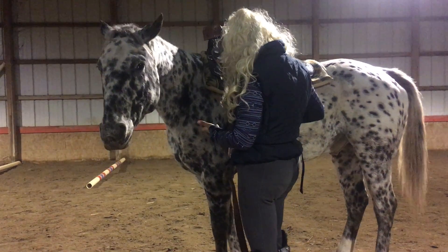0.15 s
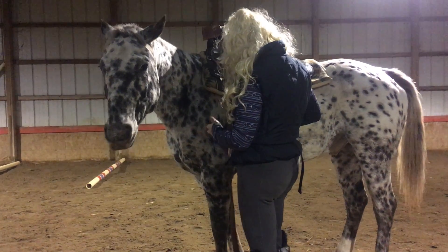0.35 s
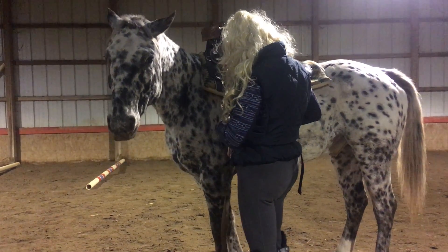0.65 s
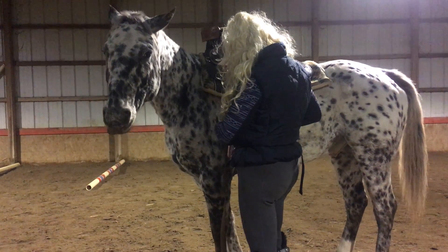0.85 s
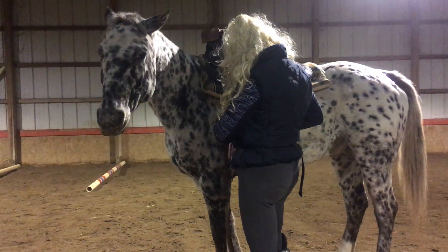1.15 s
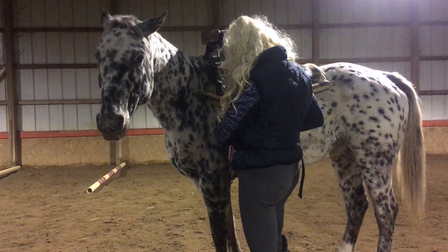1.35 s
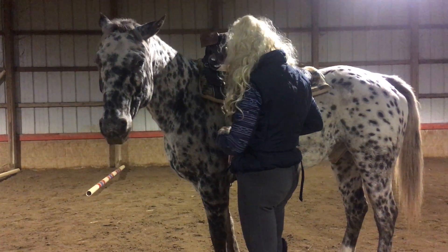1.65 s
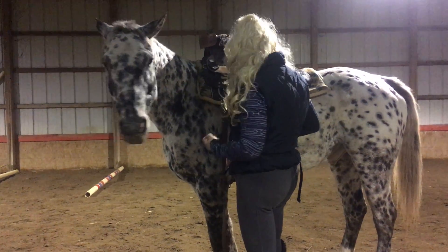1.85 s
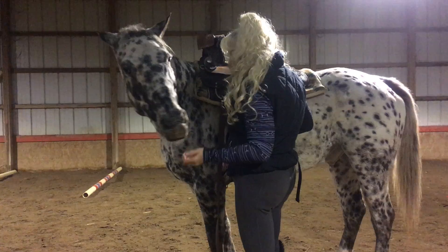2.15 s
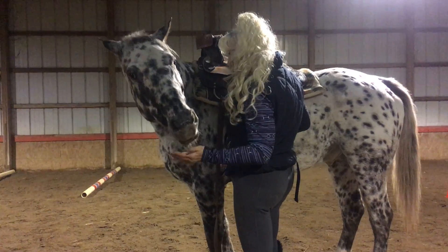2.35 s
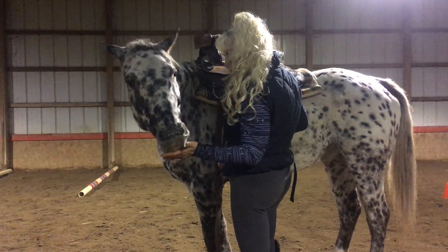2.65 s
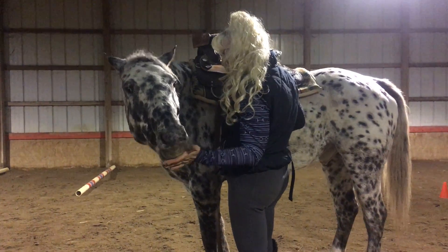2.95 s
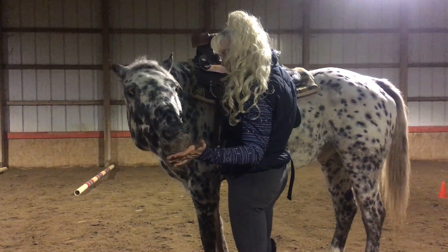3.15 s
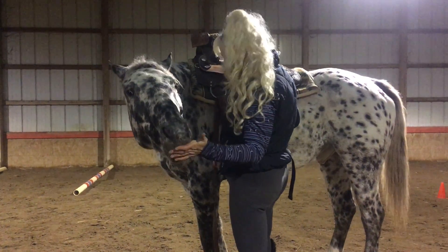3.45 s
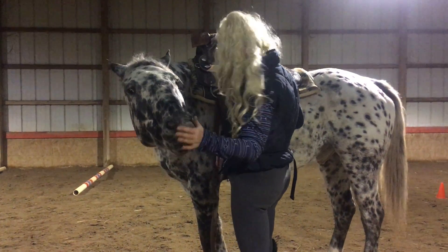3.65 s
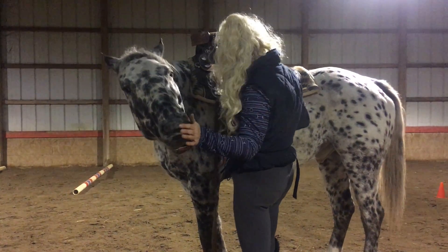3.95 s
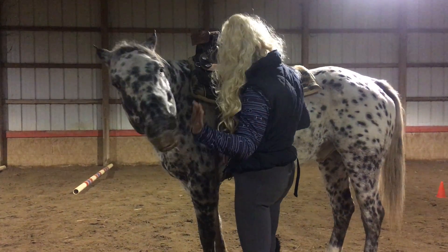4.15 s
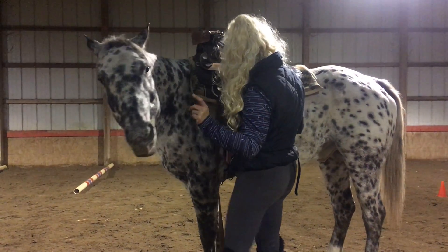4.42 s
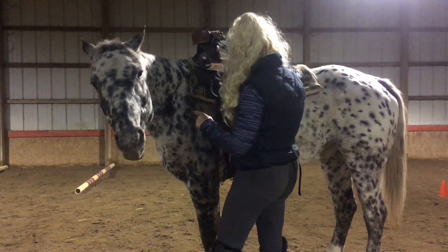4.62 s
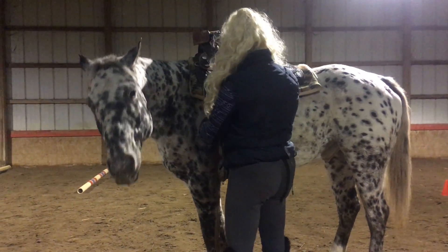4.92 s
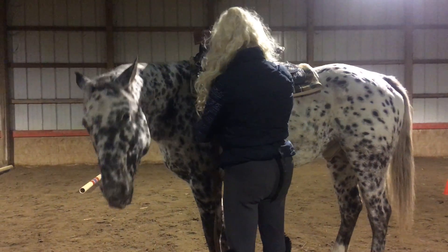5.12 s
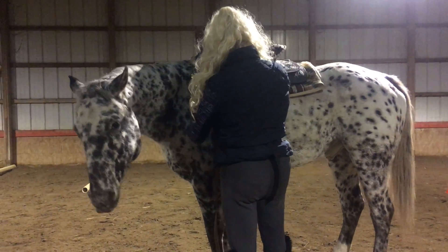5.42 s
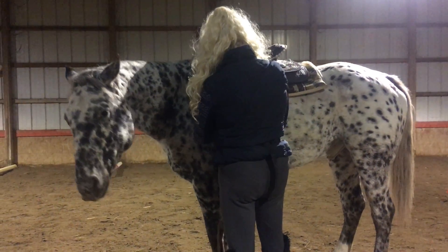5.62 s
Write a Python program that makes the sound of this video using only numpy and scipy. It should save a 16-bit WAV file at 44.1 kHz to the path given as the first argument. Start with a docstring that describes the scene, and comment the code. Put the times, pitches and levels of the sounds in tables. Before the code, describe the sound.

Even rain hisses on the sheet metal roof of a riding hall, heavy drops ticking over a soft rumble and some dull thumps.

```python
"""A riding arena in steady rain, heard from the floor below its metal roof.
Countless far drops merge into a wash, nearer ones patter, and heavy ones ping and splash on the sheets.
The building rumbles softly, with one brief hum. Two lone muffled thuds sound midway,
and a run of them passes near the end. Heavy drops and thuds reverberate in the hall."""
import sys
import numpy as np
from scipy import signal
from scipy.fft import rfft, irfft, next_fast_len
from scipy.io import wavfile
from scipy.ndimage import map_coordinates

SR = 44100
rng = np.random.default_rng(int(sys.argv[2]) if len(sys.argv) > 2 else 0)


def int16_out(signal):
    """Quantize to a 16-bit WAV file."""
    q = np.round(np.clip(np.atleast_2d(signal).T, -1, 1) * 32767)
    wavfile.write(sys.argv[1], SR, q.astype(np.int16))


N = 254898


def amp(db):
    """Decibels to gain."""
    return 10 ** (np.asarray(db) / 20)


def unit_rms(x):
    """Scale to rms 1."""
    return x / np.sqrt(np.mean(x ** 2) + 1e-20)


def at_hz(points, hz):
    """Interpolate (Hz, value) points on a log frequency axis."""
    knots_hz, values = np.transpose(points)
    return np.interp(np.log(hz + 1), np.log(knots_hz + 1), values)


def wobble(rate_hz):
    """Smooth random curve, rate_hz knots a second."""
    knots = rng.standard_normal(int(N * rate_hz / SR) + 4)
    return map_coordinates(knots, [np.arange(N) * rate_hz / SR])


def colour(x, spectrum, size=16384):
    """Apply a minimum-phase filter of unit energy."""
    gain = amp(at_hz(spectrum, np.fft.rfftfreq(size, 1 / SR)))
    cepstrum = irfft(np.log(gain))
    cepstrum[1:size // 2] *= 2
    cepstrum[size // 2 + 1:] = 0
    response = irfft(np.exp(rfft(cepstrum)))
    return signal.fftconvolve(x, response / np.linalg.norm(response))[:N]


def noise(spectrum):
    """Steady coloured noise, rms 1."""
    size = next_fast_len(N)
    gain = amp(at_hz(spectrum, np.fft.rfftfreq(size, 1 / SR)))
    return unit_rms(irfft(rfft(rng.standard_normal(size)) * gain, size)[:N])


def impacts(per_second, spread_db):
    """Impulses of random time, sign and size."""
    struck = rng.random(N) < per_second / SR
    return struck * rng.choice([-1, 1], N) * amp(spread_db * np.clip(rng.standard_normal(N), -2, 2))


def pulse(t, crest_s):
    """Soft rise to 1 at crest_s, then a quick fall."""
    u = np.maximum(t, 0) / crest_s
    return (u * np.exp(1 - u)) ** 2


def add(track, start_s, sound):
    """Mix a sound into a track."""
    part = track[max(round(start_s * SR), 0):][:len(sound)]
    part += sound[:len(part)]


# Arena reverberation. Each row: frequency in Hz, T60 in seconds.
HALL_T60 = [(100, 0.78), (1000, 0.27), (4000, 0.52), (12000, 0.18)]


def hall(x):
    """Diffuse reverberation; the top treble dies first."""
    hz, t, bands = signal.stft(rng.standard_normal(SR), SR, nperseg=256)
    decay = amp(-60 * t / at_hz(HALL_T60, hz)[:, None])
    _, tail = signal.istft(bands * decay, SR, nperseg=256)
    return signal.fftconvolve(x, tail / np.linalg.norm(tail))[:N]


# Deep rumble and wall boom. Each row: frequency in Hz, relative density in dB.
RUMBLE_SPECTRUM = [(15, -44), (30, -21), (50, -5), (72, -1.5), (95, -3.5), (135, -1), (190, -15.5),
                   (400, -63)]
BOOM_SPECTRUM = [(70, -30), (125, -8.5), (175, 0.5), (225, -2), (290, -3.5), (345, -14.5), (500, -43),
                 (1000, -76)]


def building(swell_at_s=2.88, half_width_s=0.23):
    """Roof and walls rumble, drifting slightly in level and swelling once."""
    swell_db = 2.5 * np.exp(-((np.arange(N) / SR - swell_at_s) / half_width_s) ** 2)
    rumble = amp(-55.5 + swell_db + wobble(4)) * noise(RUMBLE_SPECTRUM)
    boom = amp(-51.5 + swell_db + 0.42 * wobble(3.1)) * noise(BOOM_SPECTRUM)
    return rumble + boom


def hum(start_s=0.64, length_s=0.304, pitch_hz=185, sag_hz=22):
    """A faint low tone swells, wavers, sags in pitch and fades."""
    progress = np.clip((np.arange(N) / SR - start_s) / length_s, 0, 1)
    hz = pitch_hz - sag_hz * progress ** 3
    envelope = amp(-46 + 0.5 * wobble(17.5)) * np.sqrt(np.abs(np.sin(np.pi * progress)))
    return envelope * np.sin(2 * np.pi * np.cumsum(hz) / SR)


# Muffled blows. Each row: start in seconds, boom level in dB, boom pitch in Hz, sway level in dB.
# Both levels are trimmed in thuds().
THUDS = [(2.737, -40.5, 215, -50), (3.657, -39, 270, -59), (5.162, -32.5, 215, -48), (5.215, -26, 194, -42),
         (5.249, -27, 213, -38.5), (5.304, -28.5, 213, -40), (5.356, -34.5, 288, -40),
         (5.417, -30, 219, -50), (5.462, -33.5, 226, -51), (5.496, -30.5, 270, -53),
         (5.537, -32.5, 266, -50), (5.575, -36.5, 221, -52), (5.629, -35.5, 226, -47),
         (5.743, -36, 227, -62)]


def thuds(sway_centre_hz=79, wall_t60_s=1.0):
    """Each blow gives a few cycles of boom over a deeper sway and leaves the walls booming."""
    t = np.arange(SR) / SR
    direct, wall_power = np.zeros((2, N))
    detunes = rng.uniform(-0.95, 1, len(THUDS))
    for (start_s, boom_db, boom_hz, sway_db), detune in zip(THUDS, detunes):
        sway_hz = sway_centre_hz * np.exp(0.2 * detune)
        boom = amp(boom_db - 2) * pulse(t, crest_s=0.0097) * np.sin(2 * np.pi * boom_hz * t)
        sway = amp(sway_db + 3.5) * pulse(t, crest_s=0.016) * np.sin(2 * np.pi * sway_hz * t)
        add(direct, start_s, boom + sway)
        add(wall_power, start_s, amp(boom_db - 14.5 - 60 * t / wall_t60_s) ** 2)
    return direct + amp(-11) * hall(direct) + np.sqrt(wall_power) * noise(BOOM_SPECTRUM)


# How hard it rains. Each row: time in seconds, strength in dB.
RAIN_STRENGTH = [(0.0, -44), (0.72, -45), (1.29, -45), (1.43, -44), (1.74, -45.5), (2.32, -45), (2.48, -46),
                 (3.46, -45.5), (3.57, -44.5), (4.46, -46), (4.8, -43.5), (5.07, -45.5), (5.78, -45.5)]
# Far wash, struck roof sheets and splashes. Each row: frequency in Hz, relative density in dB.
WASH_SPECTRUM = [(150, -15), (330, -2), (480, -4), (700, -1.5), (920, 1), (1350, -1.5), (1850, -5.5),
                 (2400, -4), (3000, -3), (3700, -12.5), (4300, -16), (5000, -30.5), (8000, -41.5),
                 (10500, -45)]
SHEET_SPECTRUM = [(300, -28), (900, -9.5), (1800, -8.5), (2350, -1.5), (2950, -0.5), (3350, -5.5),
                  (3750, -10), (4300, -4.5), (4950, -18.5), (6200, -24), (8000, -39), (10500, -44),
                  (15000, -43)]
SPLASH_SPECTRUM = [(1000, -25), (2200, -9), (3500, 13), (5500, 6), (6700, 0.5), (8200, -6), (9400, -12),
                   (10500, -29), (15500, -30)]


def rain(ring_t60_s=0.11):
    """Far drops blur into a wash; drops overhead tap the sheets, ring them and throw spray."""
    strength_db = np.interp(np.arange(N) / SR, *np.transpose(RAIN_STRENGTH))
    mean_db = strength_db.mean()
    far_surge_db = 0.55 * (strength_db - mean_db)  # the far wash evens out
    near_surge_db = 1.6 * (strength_db - mean_db)
    flurry = wobble(14)  # drops arrive in small clumps
    wash = amp(1 + far_surge_db + 0.5 * wobble(8.6)) * noise(WASH_SPECTRUM)

    taps = unit_rms(colour(impacts(per_second=3000, spread_db=3), SHEET_SPECTRUM))
    patter = amp(-5 + near_surge_db + 2.05 * flurry) * taps

    ring_decay = amp(-60 * np.arange(SR // 10) / SR / ring_t60_s)
    medium_drops = impacts(per_second=55, spread_db=1)
    ring_power = signal.fftconvolve(medium_drops ** 2, ring_decay ** 2)[:N]
    ringing = unit_rms(np.sqrt(np.abs(ring_power)) * noise(SHEET_SPECTRUM))
    pings = amp(-4.5 + near_surge_db) * ringing

    droplets = unit_rms(colour(impacts(per_second=4200, spread_db=-1.5), SPLASH_SPECTRUM))
    spray = amp(-18.5 + near_surge_db + 2 * flurry + 2.5 * wobble(70)) * droplets
    return amp(mean_db) * (wash + patter + pings + spray)


def lesser_drops(count=22, ping_db=-37.5, pitch_hz=2794, splash_db=-59):
    """Rows as in HEAVY_DROPS, one at random in each time slot, scattered about typical values."""
    starts_s = (np.arange(count) + rng.random(count)) * N / SR / count
    scatter = np.clip(rng.standard_normal((count, 3)), -1.5, 1.5)
    return [(start_s, ping_db + 3 * size, pitch_hz * np.exp(0.064 * detune), splash_db + 2 * wetness)
            for start_s, (size, detune, wetness) in zip(starts_s, scatter)]


# Heaviest drops. Each row: start in seconds, ping level in dB, pitch in Hz, splash level in dB.
# Both levels are trimmed in roof_drops().
HEAVY_DROPS = [(0.1977, -31.5, 2630, -61), (0.3765, -33, 2330, -56), (0.5939, -32, 3020, -50.5),
               (0.798, -32.5, 2970, -62), (0.8534, -39, 2720, -53), (0.9183, -28.5, 2650, -58),
               (0.9978, -31.5, 2800, -58), (1.2176, -35, 2640, -51.5), (1.3074, -28.5, 2910, -59),
               (1.5534, -41, 2900, -54), (1.842, -28.5, 2310, -64), (1.9566, -31.5, 2680, -50),
               (2.2119, -33, 2950, -48.5), (2.3043, -30, 3010, -57), (2.8894, -30.5, 2390, -54),
               (2.9442, -30.5, 2970, -61), (3.0475, -39, 2870, -57), (3.0982, -39, 2750, -54),
               (3.2764, -40, 2720, -53), (3.3722, -34, 2740, -48), (3.4212, -28, 2680, -49),
               (3.5139, -30, 3070, -55), (3.5538, -31.5, 2610, -46), (3.674, -28.5, 2800, -43.5),
               (3.7462, -28, 2690, -60), (4.0847, -31, 2700, -58), (4.1659, -34, 2640, -61),
               (4.2588, -27, 2910, -51), (4.452, -32, 2860, -54.5), (4.6309, -29.5, 2860, -54.5),
               (4.8125, -32.5, 2740, -50.5), (5.09, -29, 2540, -48), (5.2034, -40, 3070, -49.5),
               (5.2799, -32.5, 2950, -55), (5.3898, -36, 3050, -54), (5.5442, -34, 2750, -49.5),
               (5.691, -30.5, 2640, -52.5)]
# Finest spray. Each row: frequency in Hz, relative density in dB.
MIST_SPECTRUM = [(5000, -14), (8500, 8), (10400, -2), (12000, 0), (15500, -5)]


def roof_drops(crest_s=0.0028, reland_s=0.013):
    """Each big drop briefly rings a sheet at its own pitch and scatters droplets that land again."""
    t = np.arange(SR // 8) / SR
    strike = pulse(t, crest_s)
    spatter = pulse(t, 1.2 * crest_s) + amp(-9) * pulse(t, reland_s)
    tones, clatter, splashes, mist = np.zeros((4, N))
    for start_s, ping_db, pitch_hz, splash_db in [*HEAVY_DROPS, *lesser_drops()]:
        clatter_noise, splash_noise, mist_noise = rng.standard_normal((3, len(t)))
        mist_db = splash_db - 20.5 + 1.5 * rng.standard_normal()
        add(tones, start_s, amp(ping_db - 8.5) * strike * np.sin(2 * np.pi * pitch_hz * t))
        add(clatter, start_s, amp(ping_db - 7.5) * strike * clatter_noise)
        add(splashes, start_s, amp(splash_db + 2.5) * spatter * splash_noise)
        add(mist, start_s, amp(mist_db) * spatter * mist_noise)
    metal = tones + colour(clatter, SHEET_SPECTRUM)
    water = colour(splashes, SPLASH_SPECTRUM) + colour(mist, MIST_SPECTRUM)
    direct = metal + water
    return direct + amp(-8.5) * hall(direct)


def scene():
    """Everything heard under the roof, in mono."""
    return (rain() + roof_drops() + thuds() + building() + hum())[None]


# Microphone hiss. Each row: frequency in Hz, relative density in dB.
HISS_SPECTRUM = [(1000, 9), (9500, 2.5), (10400, -4.5), (11300, 1), (16000, 2)]


def record(dry):
    """The microphone adds faint hiss and passes nothing above its band limit."""
    hiss_db, limit_hz = -71.5, 15750
    size = next_fast_len(N + SR // 2)
    heard = dry + amp(hiss_db) * noise(HISS_SPECTRUM)
    passband = np.fft.rfftfreq(size, 1 / SR) < limit_hz
    return irfft(rfft(heard, size) * passband, size)[..., :N]


dry = scene()
out = record(dry)
int16_out(out)
```